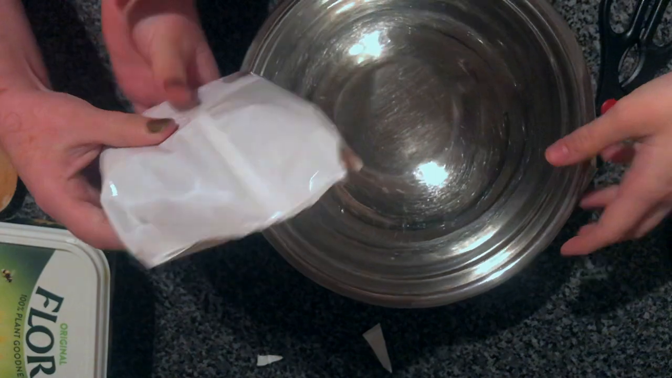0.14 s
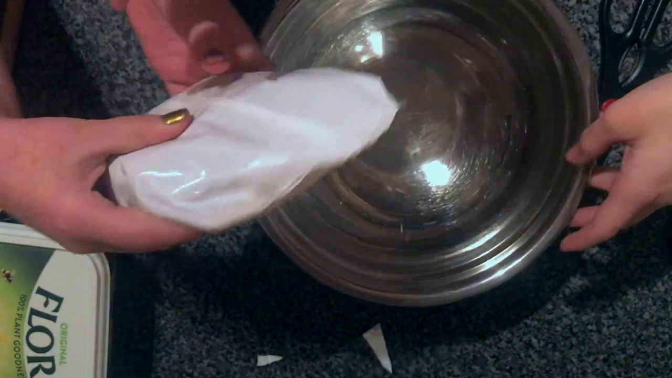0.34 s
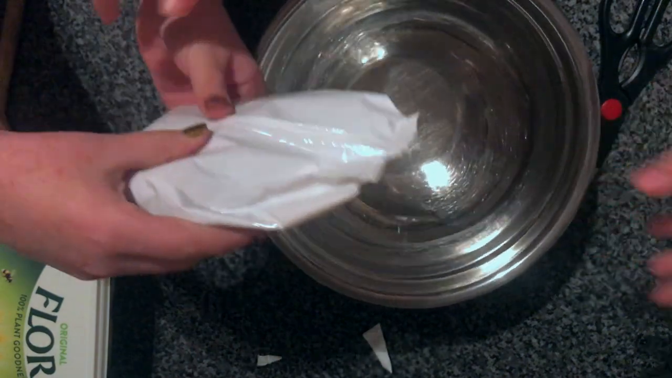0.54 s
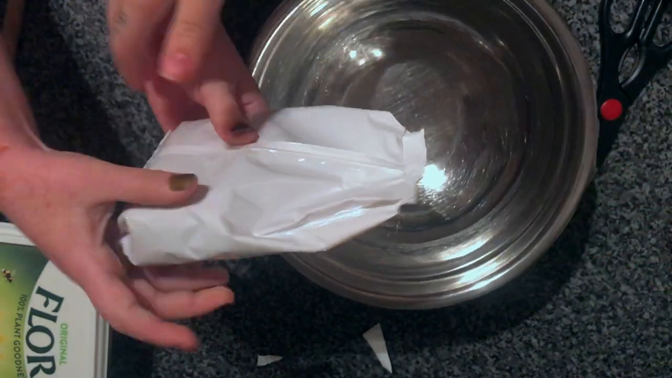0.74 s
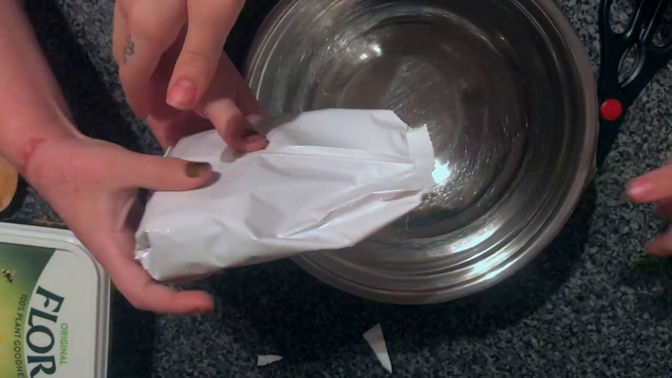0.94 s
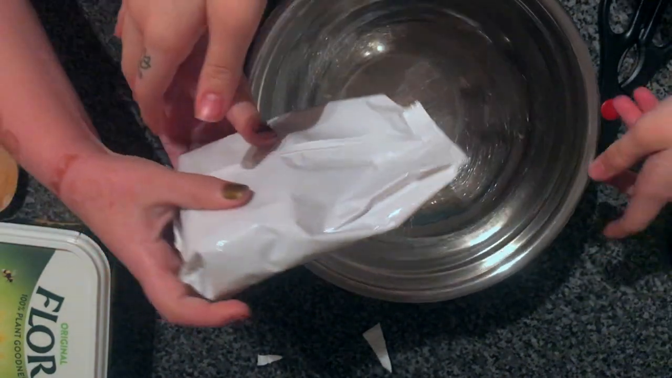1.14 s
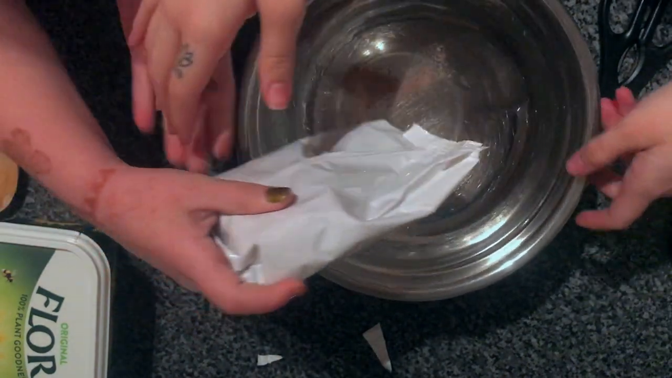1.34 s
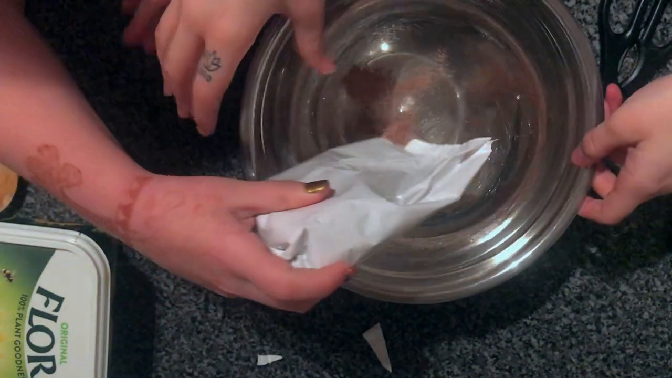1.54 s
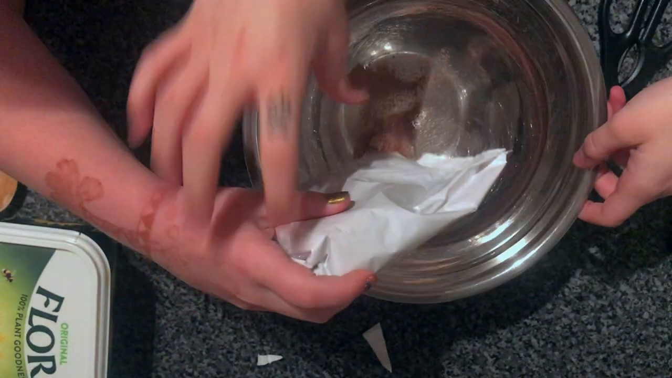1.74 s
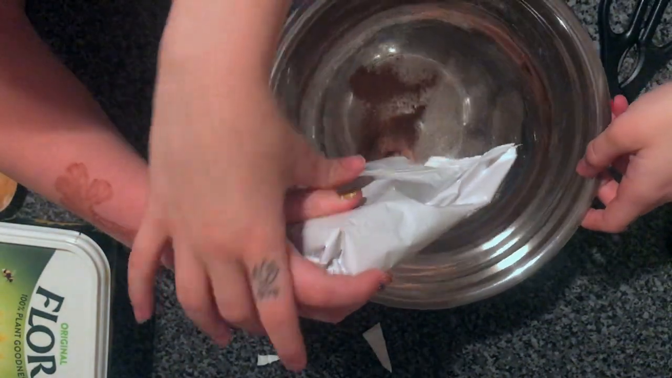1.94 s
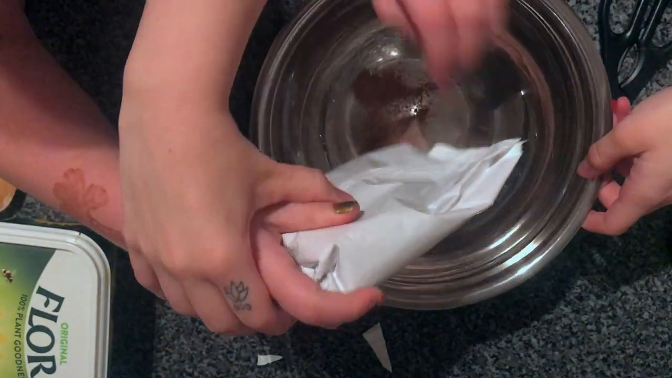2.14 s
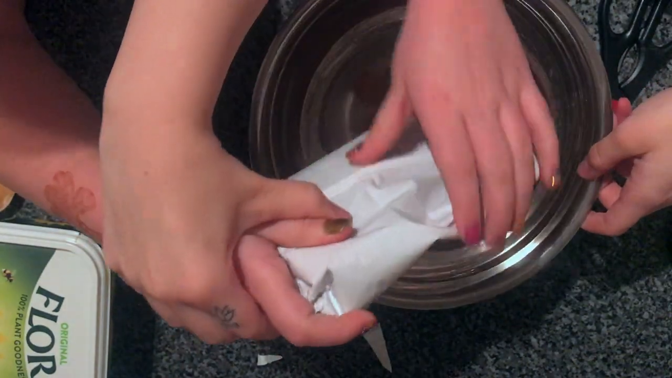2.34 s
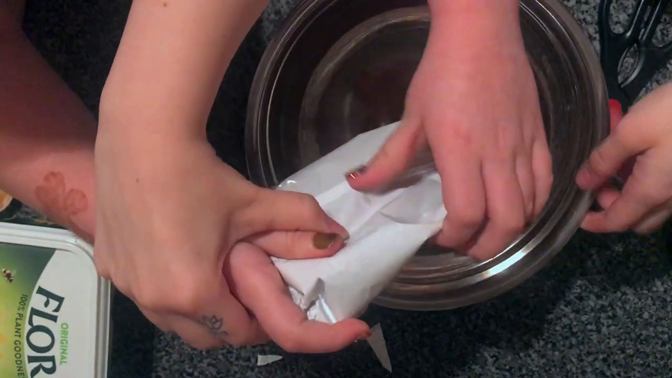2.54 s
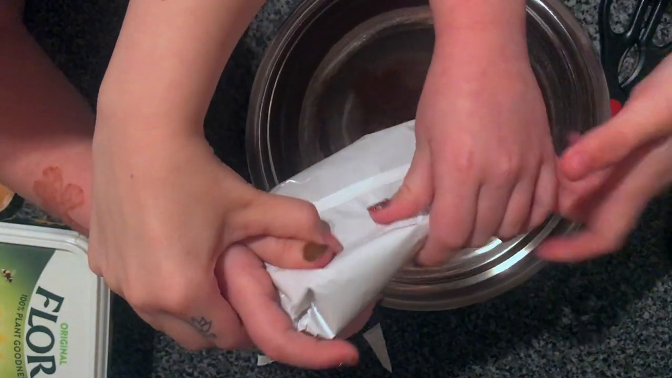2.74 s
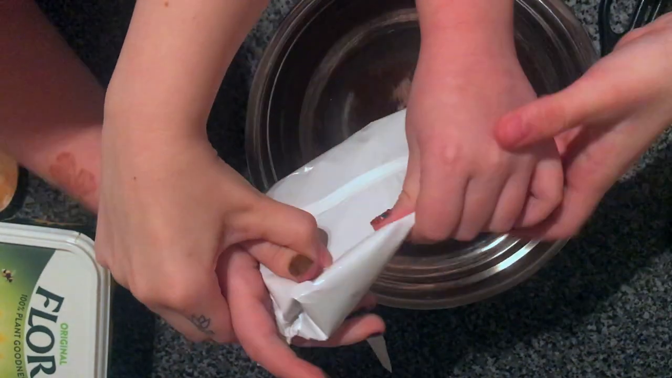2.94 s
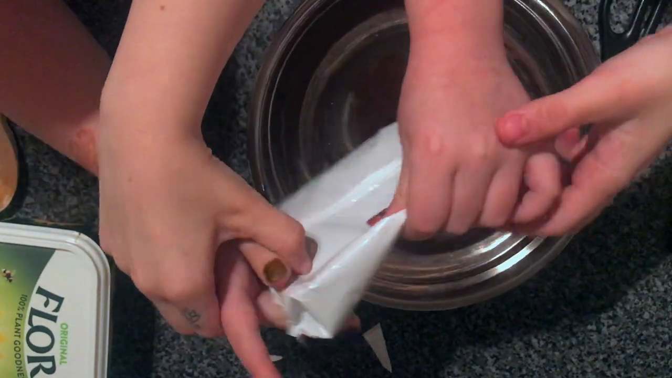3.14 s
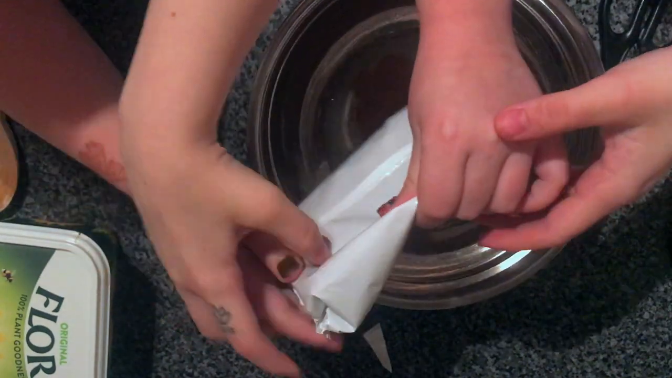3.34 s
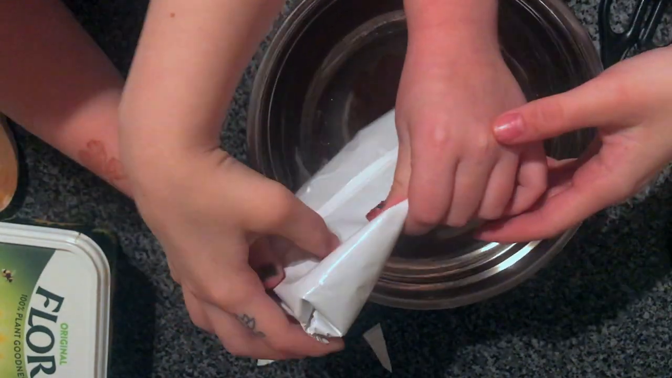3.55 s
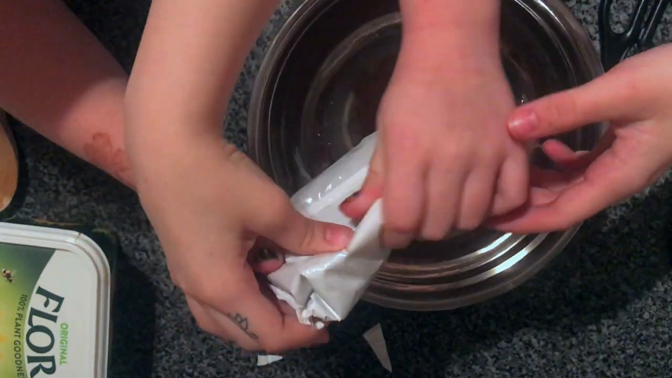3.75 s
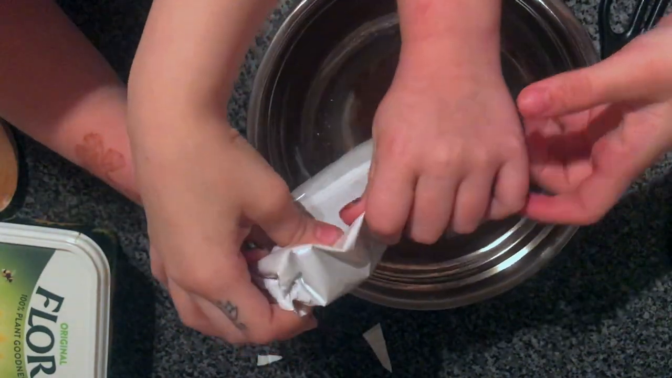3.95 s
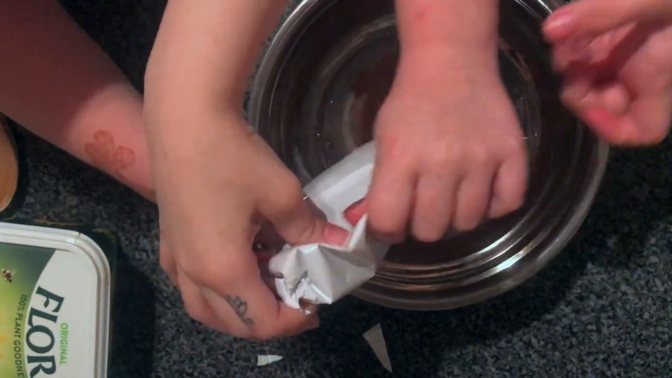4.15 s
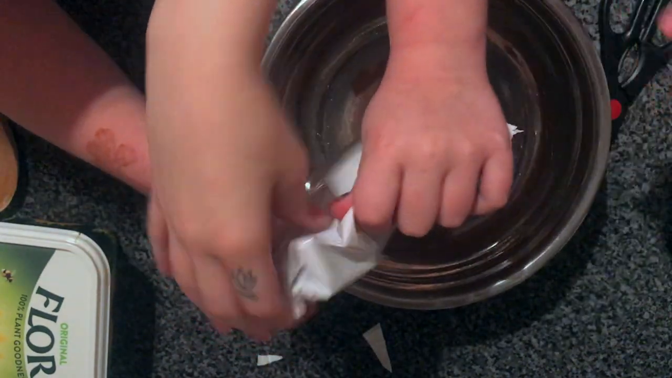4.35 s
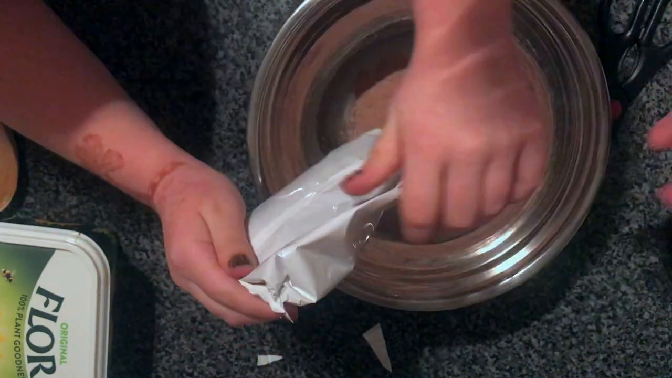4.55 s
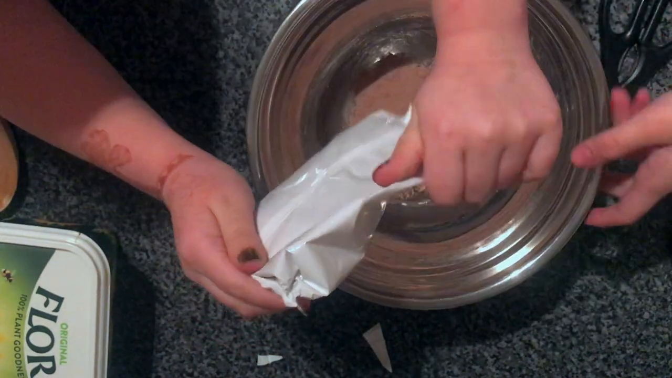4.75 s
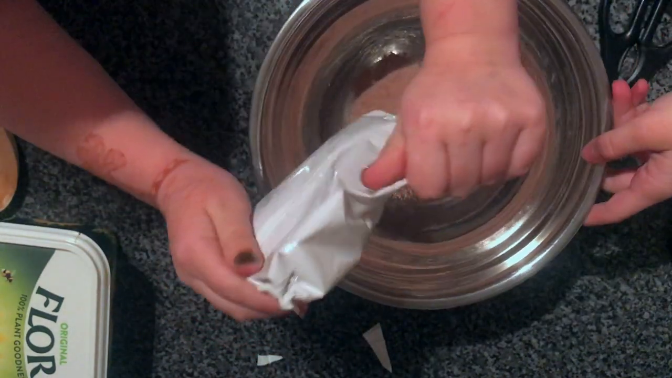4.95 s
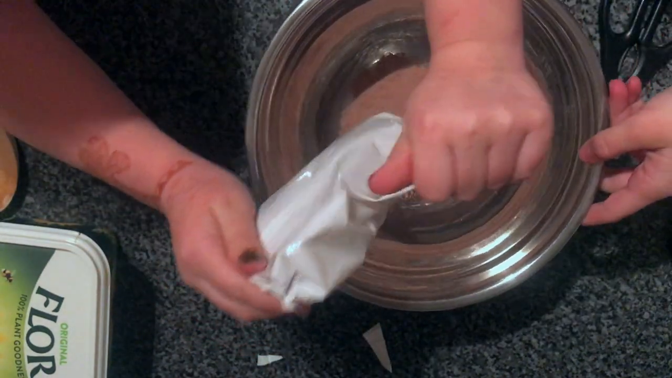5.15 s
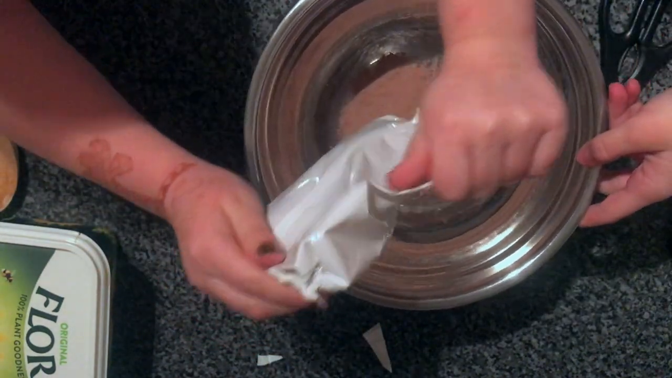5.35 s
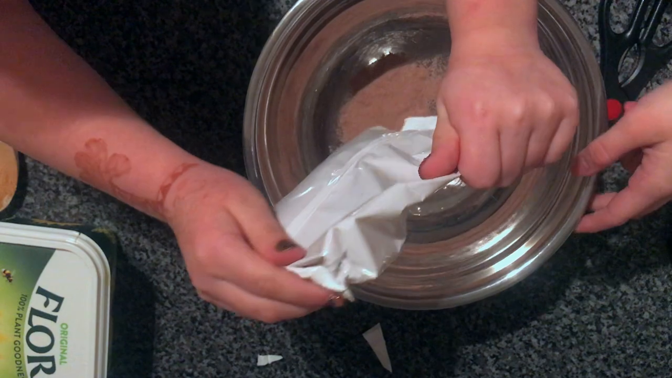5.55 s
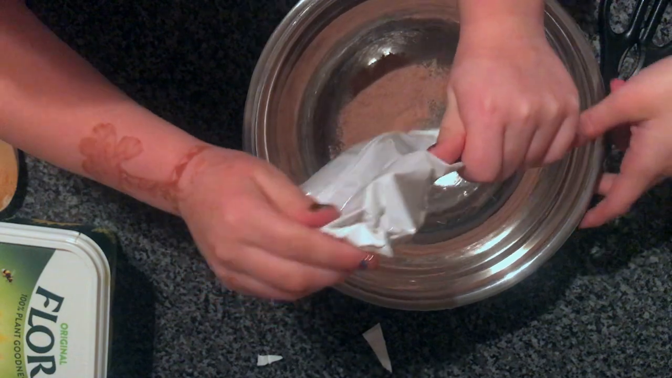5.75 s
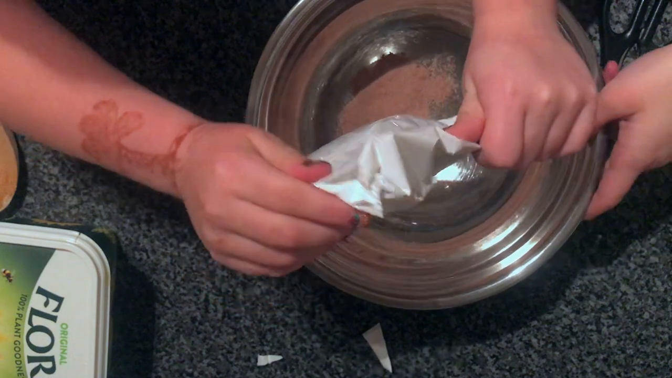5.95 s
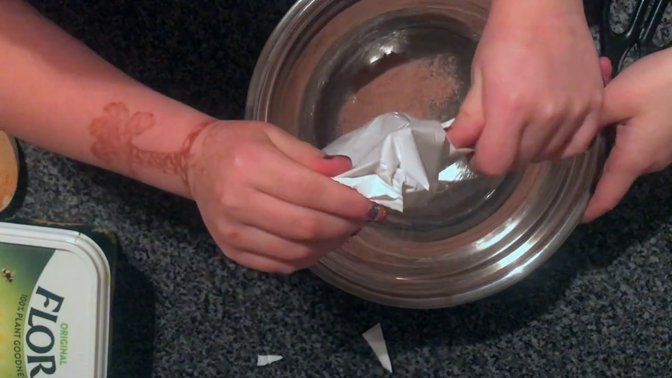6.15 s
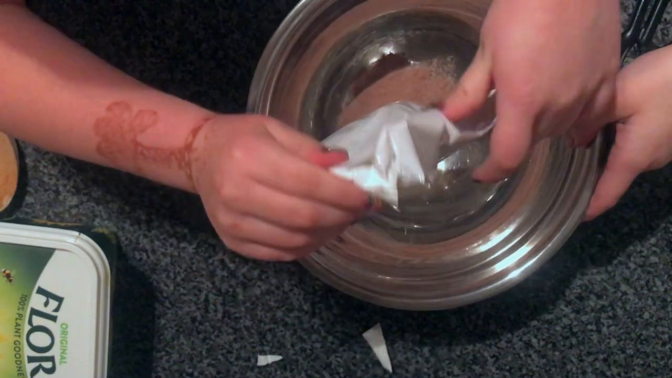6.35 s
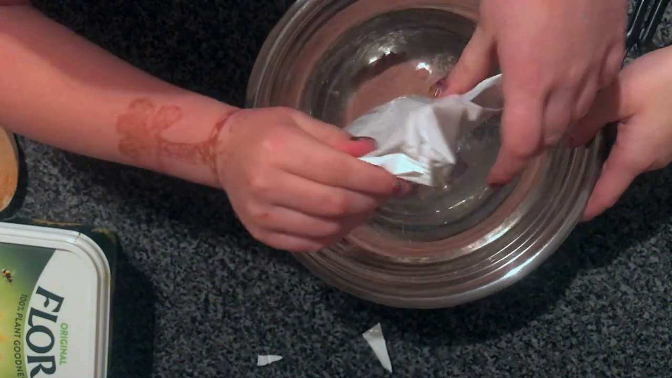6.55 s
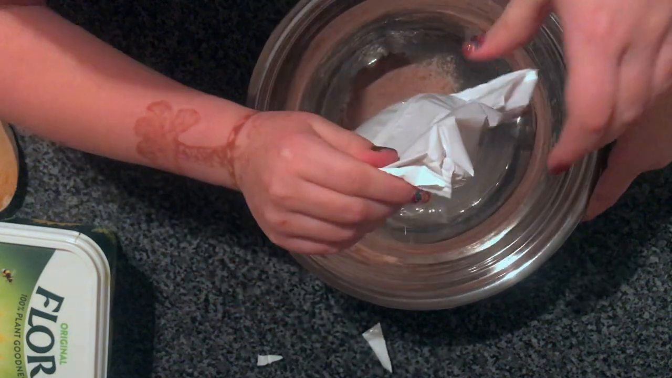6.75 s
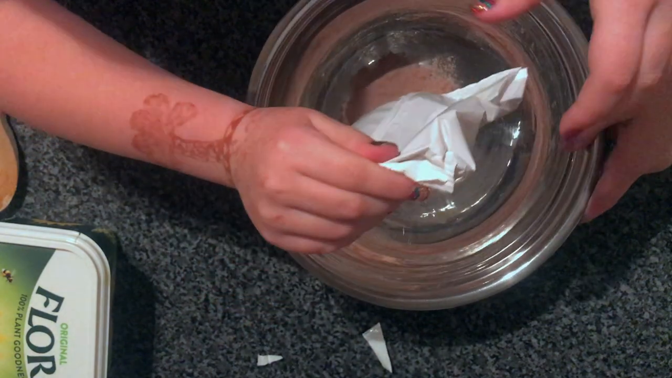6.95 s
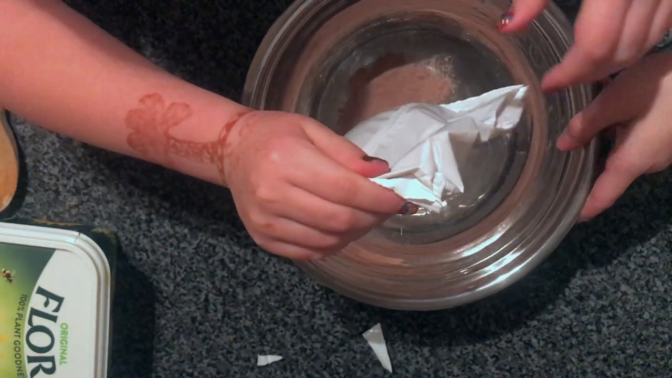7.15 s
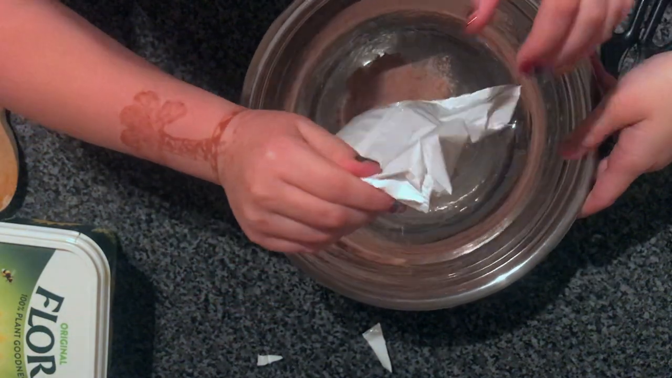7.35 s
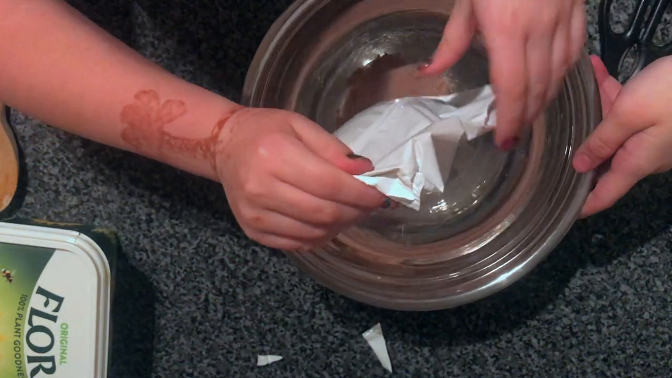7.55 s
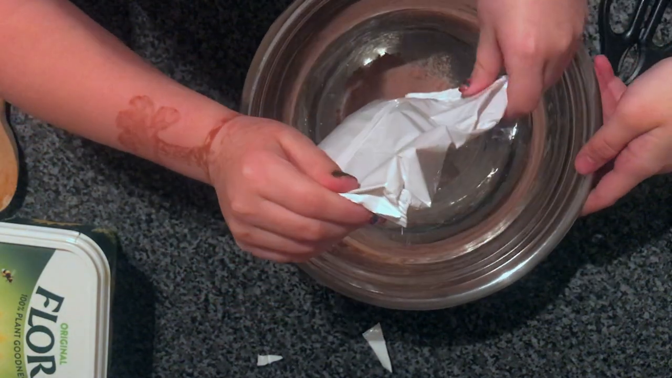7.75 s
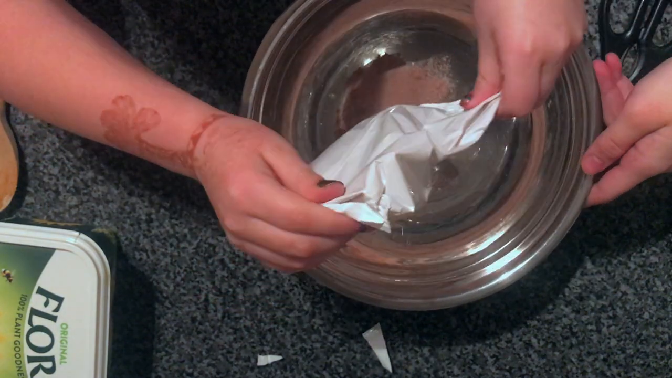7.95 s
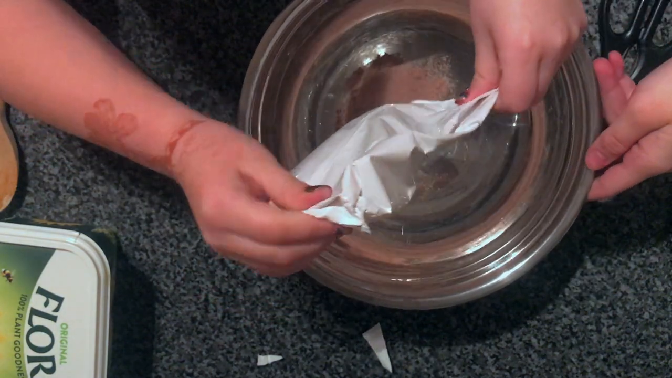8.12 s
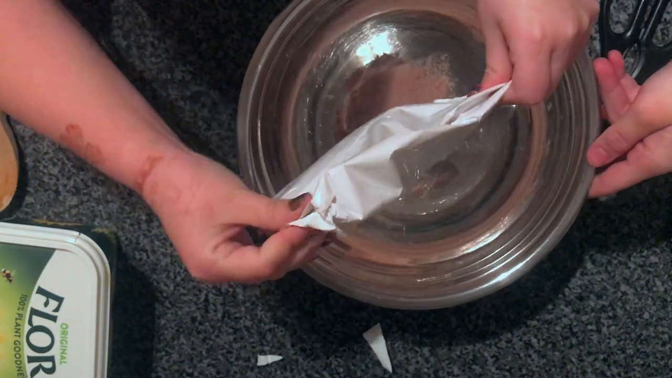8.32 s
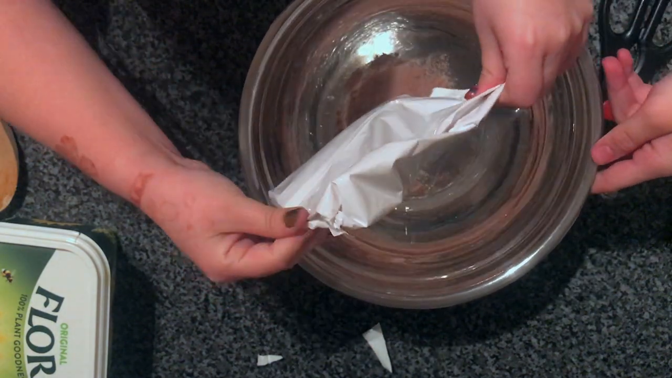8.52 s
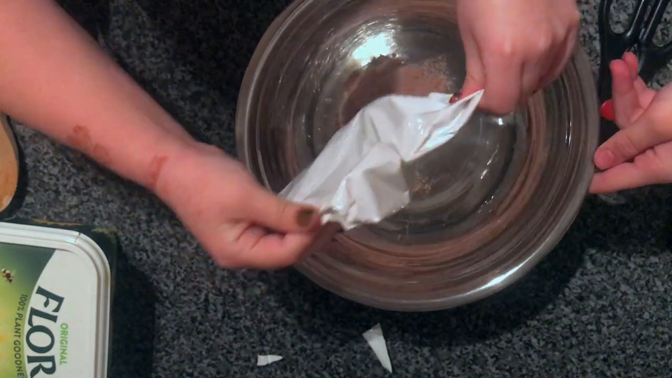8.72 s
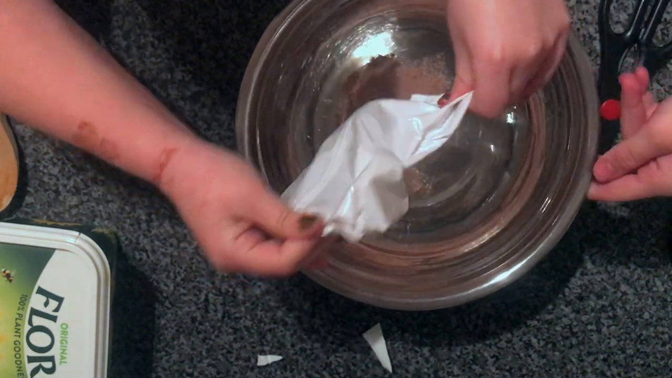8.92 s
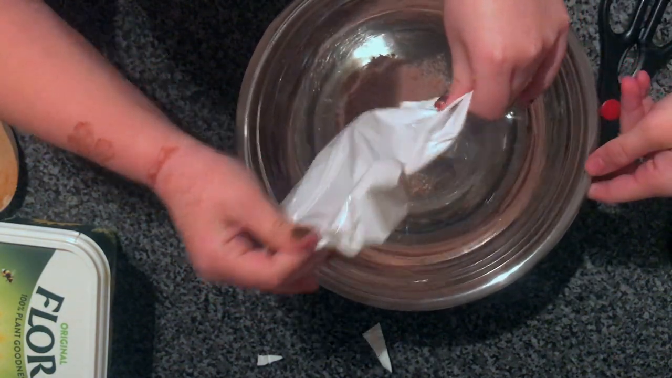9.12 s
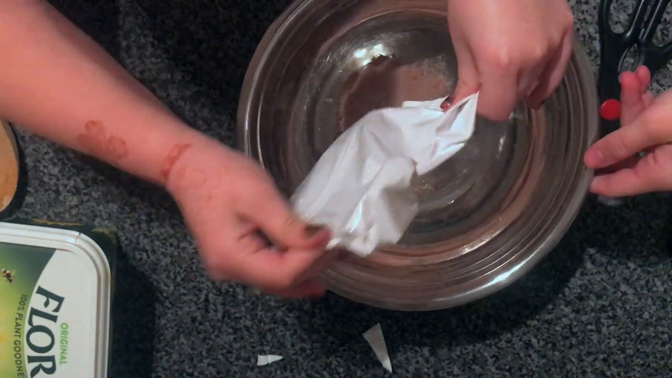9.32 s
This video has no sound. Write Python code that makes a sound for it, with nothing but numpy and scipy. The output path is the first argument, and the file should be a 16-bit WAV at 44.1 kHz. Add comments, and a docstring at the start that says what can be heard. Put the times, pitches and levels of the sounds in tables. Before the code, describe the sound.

A stiff foil-lined packet is shaken, squeezed and crumpled over a metal bowl, crackling in sharp irregular bursts with an early hiss of pouring powder.

```python
"""A stiff foil-lined packet is shaken, squeezed and crumpled over a steel bowl on a kitchen counter.
Creases are filtered clicks with bowl echoes and a panel rattle; finer ones are ticked noise; puffs are sines.
Early on powder pours (shaped noise); thuds on the hollow counter, taps and metal clinks are decaying modes.
A small room adds a diffuse tail; the kitchen hums faintly as shaped noise."""
import sys
import numpy as np
from scipy import signal
from scipy.fft import rfft, irfft, next_fast_len
from scipy.io import wavfile
from scipy.ndimage import map_coordinates

SR = 44100
rng = np.random.default_rng(int(sys.argv[2]) if len(sys.argv) > 2 else 0)


def store_pcm(level_fs):
    """Save levels as 16-bit WAV."""
    pcm = np.round(np.clip(level_fs, -1, 1) * 32767).astype(np.int16)
    wavfile.write(sys.argv[1], SR, np.atleast_2d(pcm).T)


N = 418068

# handling of the packet: t/s, fine crackle level/dB, shifting powder level/dB
HANDLING_LEVELS = [(0.0, -60.5, -68.5), (0.58, -60.5, -58.5), (1.08, -69, -70), (1.4, -58.5, -62),
                   (1.95, -64.5, -62), (2.85, -49, -57), (3.54, -63, -65.5), (3.72, -51, -56),
                   (4.3, -46, -51.5), (4.5, -60.5, -61.5), (4.7, -60, -60.5), (4.94, -45.5, -55.5),
                   (5.35, -47.5, -55), (5.55, -53, -65.5), (6.55, -62, -67), (6.9, -71, -74.5),
                   (7.3, -72, -75.5), (7.7, -67, -65), (8.24, -50.5, -61.5), (8.74, -55.5, -60.5),
                   (8.9, -43, -54.5), (9.48, -50.5, -55.5)]


def amp(db):
    """Gain of a level in dB."""
    return 10 ** (np.asarray(db) / 20)


def unit(x):
    """x at rms 1."""
    return x / np.sqrt(np.mean(x ** 2) + 1e-20)


def along(points, hz):
    """Interpolates (f/Hz, value) points on a log frequency axis."""
    f, v = np.transpose(points)
    return np.interp(np.log(hz + 1), np.log(f + 1), v)


def curves(rows):
    """One value per sample for each column after the time."""
    s, *cols = np.transpose(rows)
    return [np.interp(np.arange(N) / SR, s, c) for c in cols]


def wobble(rate_hz):
    """A smooth random curve with rate_hz knots a second."""
    knots = rng.standard_normal(int(N * rate_hz / SR) + 4)
    return map_coordinates(knots, [np.arange(N) * rate_hz / SR])


def causal(x, gain_db):
    """x through a minimum-phase filter (folded cepstrum); gain_db maps Hz to dB."""
    m = next_fast_len(x.shape[-1] + 2048)
    m += m % 2
    gain = np.maximum(amp(gain_db(np.fft.rfftfreq(m, 1 / SR))), 1e-6)
    cep = irfft(np.log(gain), m)
    cep[..., 1:m // 2] *= 2
    cep[..., m // 2 + 1:] = 0
    return irfft(rfft(x, m) * np.exp(rfft(cep)), m)[..., :x.shape[-1]]


def place(times_s, rows):
    """Sums one short sound per row at its time."""
    start = np.round(np.asarray(times_s) * SR).astype(int)
    at = start[:, None] + np.arange(rows.shape[1])
    return np.bincount(at.ravel(), rows.ravel(), N + rows.shape[1])[:N]


def snaps():
    """A crease flips with a sharp click, the bowl returns it, and the panel rattles for a few milliseconds."""
    # loud creases: t/s, level over 0.6 ms/dB, body under 2 kHz/dB, sparkle over 8 kHz/dB, panel f/Hz
    loud_creases = [(0.0153, -28.5, -12, -12, 3530), (0.0306, -27, -15, 7, 5600.0),
                    (0.0737, -25.5, -2, 2, 5640.0), (0.0837, -27, 1, -1, 4230), (0.23, -37, -15, 4, 3800),
                    (0.2842, -37, -2, -5, 5940), (0.3378, -22.0, -5.0, -5.5, 2040.0),
                    (0.6072, -24.5, -9, -9, 4560), (0.6628, -20.5, -10, -10, 4300),
                    (0.7085, -30, 1, -6, 4050.0), (0.7581, -30.5, -13, -8.5, 4270),
                    (1.0566, -35.5, -10, -5.5, 3700.0), (1.2074, -33.5, 7, -8, 6290),
                    (1.252, -21, -10, -6, 2370), (1.4259, -37, 2, -6, 4570), (1.544, -29, 3, -8, 3060.0),
                    (1.5732, -24.5, -7.0, -2, 4100), (1.6782, -39.5, 2, -11, 1510),
                    (1.8044, -19.5, 4.5, -10, 1840.0), (2.1164, -38, 14, -29, 895.0),
                    (2.184, -39, 4, -31, 1810), (2.1982, -34.5, 3, -37, 2250), (2.2464, -30, -1, -3, 6370),
                    (2.261, -24, -4.5, -13, 1160.0), (2.3001, -23.5, 1, -28, 1020),
                    (2.31, -24.0, 7, -12.0, 1700), (2.3316, -14.0, -5, -4.5, 1250),
                    (2.4345, -16.0, -4.5, 0.5, 3320.0), (2.5466, -18.5, -7, -3, 5850.0),
                    (2.6068, -9.5, -4.5, 0, 4800), (2.6536, -25, -3, -9.0, 1450),
                    (2.6981, -19.5, -2, -6, 1340), (2.7185, -18.5, -2, -9.5, 1380),
                    (2.7502, -15, 4, 2, 2370.0), (2.7637, -10.5, -2.5, -5.5, 1290.0),
                    (2.8, -16, -1, -6, 5130.0), (2.8143, -16, -10.0, -1.0, 3320.0),
                    (2.8194, -13, 0, -7.0, 3350.0), (2.8229, -14.0, -1.5, -14, 2190),
                    (2.828, -19, 0, -18, 890), (2.8344, -17, -5, -3, 5860.0),
                    (2.8466, -18.5, -18, -7, 2450), (2.8964, -23.5, -10, -8, 990),
                    (2.9165, -26.0, 0, -20.0, 1800), (2.9802, -26.5, -8.0, -17, 1700),
                    (3.0373, -12.5, -11.5, -5, 6050), (3.1073, -23, 1.5, -3, 2360),
                    (3.1253, -23, -0.5, -6, 870.0), (3.2488, -19, 3.0, -3, 2350),
                    (3.2689, -16.5, -2.5, -5, 3720), (3.3206, -19, -7, -4, 1620),
                    (3.4292, -29.5, -5, -14.0, 4150.0), (3.5778, -25, -20, 0, 6860.0),
                    (3.5901, -16.5, -12, -12, 2430), (3.629, -24.5, -1, -16, 2110),
                    (3.6494, -23.5, -2, -2, 6590.0), (3.6666, -20, -6.0, -10, 4040),
                    (3.6884, -18, -4.0, -9, 1570), (3.7413, -22.5, -6, -14.5, 2630),
                    (3.8209, -10.5, -1, 3, 1590), (3.8309, -18, 0, -15.5, 2440.0),
                    (3.8733, -12.5, -11, 0.5, 4200), (3.8988, -27.5, -9, -2, 5210),
                    (3.9287, -23.0, -8.0, -2, 3500), (3.9358, -22.5, -18, -8, 5900.0),
                    (4.0254, -10.5, -7.5, 1, 3730), (4.0446, -11, 0.5, -10, 3270),
                    (4.0674, -20.5, -8, -7, 2730), (4.0806, -23, -4, -2.5, 940),
                    (4.1588, -23, 1, -15.0, 2630.0), (4.1729, -12.5, -6.5, -20, 940),
                    (4.1796, -6, -9, -5, 3270), (4.2475, -13.0, -5.5, -0.5, 3580),
                    (4.2759, -27, -8, -7.0, 4180.0), (4.2963, -14, -5, -2, 6700.0),
                    (4.3246, -28, -3, -23, 3400.0), (4.3362, -17.0, 2, 0.0, 7000.0),
                    (4.3673, -21.5, -1.0, -6, 3600), (4.3869, -17.5, -13, -2, 3420.0),
                    (4.4265, -21.5, 5, -4, 3120.0), (4.4374, -20.0, -1, -19, 2460.0),
                    (4.4674, -29, -6, 0, 3630.0), (4.639, -38, -11, -18, 1600),
                    (4.6675, -29, -7, -20.0, 1460.0), (4.7558, -22, -3, -4.0, 2870.0),
                    (4.7739, -8.5, -2, 4, 4200), (4.7839, -9, -8, -2.5, 5640.0),
                    (4.8384, -16.5, -8, -10, 4570.0), (4.8532, -17.5, -4, -9, 3270.0),
                    (4.881, -14.5, -15.5, -4, 3880.0), (4.9094, -18, -6.0, -25, 3750.0),
                    (4.9186, -15, -2, 5, 3490.0), (4.9527, -12.5, -2.5, 1.5, 3880),
                    (5.0475, -18.5, -7, -42.5, 1600.0), (5.0593, -26, 1, -24, 2230.0),
                    (5.0674, -16.5, -6, -3, 2130), (5.0958, -26.5, -6.5, 11, 6550.0),
                    (5.1309, -14, -17, -8.5, 4300), (5.1592, -15.5, -2, -0.5, 3130),
                    (5.2633, -21.5, 0.5, -30, 3070), (5.3036, -21, 2, -23, 4000),
                    (5.3499, -33, 16, -15, 1680.0), (5.382, -16.5, -6, -10, 3660.0),
                    (5.4011, -11.5, -3, -8, 3900), (5.4076, -5.0, -7.5, -2, 2190),
                    (5.4815, -26.5, 1, -8, 1600), (5.499, -34, 6, -13.5, 3970), (5.545, -22, -19, -2, 6400),
                    (5.675, -24.5, -4, 0, 1590), (5.7453, -28, -9.5, -14.5, 3300.0),
                    (5.7537, -17, 5.5, -2, 3140), (5.7794, -8, -12.5, -3.5, 3750),
                    (5.8365, -28.5, 2, -8.5, 4090.0), (5.9901, -14.5, -9, 8, 2470),
                    (6.0328, -21.5, -3, -11.5, 1340), (6.0824, -31, -12, -2.0, 1530),
                    (6.1404, -22.0, -5, -7, 3720), (6.1792, -33, 2.5, -9, 2150.0),
                    (6.2833, -26.5, -2.5, -26.5, 2150), (6.3772, -35, 2.5, -10.5, 1720.0),
                    (6.4836, -28, -0.5, -16.5, 2690), (6.5186, -24, 4, -6.5, 2580.0),
                    (6.5415, -25.5, 2.5, -7, 1480), (6.6902, -16.5, -30.5, -1.5, 5370),
                    (6.9528, -42, 4.0, -5.5, 1680.0), (7.338, -53, -10, -5, 3340),
                    (7.5271, -48.5, -12, -13, 3830), (7.7904, -27.5, -6, -12.5, 3640),
                    (7.8281, -12, -3.5, -3.5, 1970), (7.8806, -30.5, 2, 4, 1070),
                    (7.9436, -27.0, -11, -12, 1740.0), (7.9904, -22.5, -23.0, -2, 5330),
                    (8.0151, -27.0, 2, -4, 3360.0), (8.0806, -16.5, -7.5, 4.5, 2630.0),
                    (8.1247, -18.5, -14, -8.5, 2080), (8.1415, -32, 4, -5, 2200),
                    (8.1802, -21, -8, -17, 1810.0), (8.2074, -15, -6, -2.5, 2260),
                    (8.2516, -25, -6.0, -7.5, 2630.0), (8.2711, -20.0, -4, -9.0, 5170.0),
                    (8.2855, -15.5, -7, -4.5, 5800.0), (8.367, -12.5, -10.0, -2.5, 2290),
                    (8.404, -20, -7, 2.0, 3490.0), (8.4159, -16.5, 0.5, -11.5, 2330),
                    (8.4652, -20, 9, -8, 1780.0), (8.486, -25.5, 7, -6.5, 2630),
                    (8.5226, -14.5, -9.0, -9, 2500), (8.5436, -21, -7, 0, 1720.0),
                    (8.6749, -12.5, -14, -8, 2540), (8.6883, -17, -17, -12, 3920.0),
                    (8.6986, -13.5, -11, 6, 2400.0), (8.7199, -20, 3.0, -14.0, 1960),
                    (8.7374, -16.5, 1, -7, 2780.0), (8.776, -15.5, -10, -16, 2820),
                    (8.7867, -23.5, -12, 0, 3170.0), (8.8173, -19, -9, -7, 2500.0),
                    (8.84, -12.5, -3.5, -4.5, 4600), (8.9141, -14, -32.0, -1, 6700.0),
                    (8.9517, -14, -6, -1, 2410.0), (8.9754, -8.5, -1, 6, 2360),
                    (8.9887, -18, -13, 2, 7100.0), (9.0264, -24, -17, -4, 2020.0),
                    (9.0388, -9, -8, 0.5, 2680), (9.0923, -20, -26.0, -6.0, 5530),
                    (9.1257, -14.5, -5.0, 1, 1740), (9.1609, -26, -4.0, -20, 1800.0),
                    (9.1705, -8, -15, 4.5, 2540), (9.1854, -12.5, 0, 4, 2700),
                    (9.2262, -25, -13, 0, 5000.0), (9.2509, -22.5, -1.5, -8, 2400),
                    (9.3203, -24.5, -19, -2.0, 4260.0), (9.3304, -13.5, -26.0, 5.5, 2440),
                    (9.3869, -21, -3, -10.0, 1770), (9.3966, -17.5, -3.5, -15, 2380),
                    (9.4249, -22, -9, -6.0, 1800), (9.452, -21.5, 1, -3.5, 2500.0)]
    # bowl reflections: delay/s, level/dB
    bowl_echoes = [(.0017, -15), (.0035, -12)]
    bag_hz, bag_db = 314, 13.5  # the whole packet flexes with each crease

    creases = np.vstack([loud_creases, small_creases()])
    s, db, body_db, sparkle_db, panel_hz = np.transpose(creases)[:, :, None]
    t = np.arange(SR // 20) / SR
    noise = rng.standard_normal((len(s), 2 * len(t)))
    click = (t == 0) + 0.7 * noise[:, :len(t)] * amp(-60 * t / 0.0018)
    click = click + sum(amp(g) * np.roll(click, round(d * SR), axis=1) for d, g in bowl_echoes)
    dull = signal.lfilter([.6], [1, -.4], noise[:, len(t):])  # the rattle is duller than the click
    rattle = amp(-7.5 - 60 * t / 0.027) * (1 - np.exp(-t / 0.00026)) * dull

    def colour_db(hz):
        low = np.clip(np.log2(2200 / (hz + 1)) / 1.3, 0, 1)
        high = np.clip(np.log2((hz + 1) / 6000) / 0.53, 0, 1)
        thin_db = -16 * np.clip(np.log2(850 / (hz + 1)), 0, 6)  # a small panel radiates little bass
        flex_db = bag_db / (1 + (np.log2((hz + 1) / bag_hz) / .5) ** 2)
        panel_peak_db = 12 * np.clip(2500 / panel_hz, .3, 1)  # weaker when high
        panel_db = panel_peak_db / (1 + (np.log2((hz + 1) / panel_hz) / .11) ** 2)
        cavity_db = 6 / (1 + ((hz - 1040) / 60) ** 2)  # the air in the bowl
        return body_db * low + sparkle_db * high + thin_db + flex_db + panel_db + cavity_db

    rows = causal(click + rattle, colour_db)
    size = np.linalg.norm(rows, axis=1, keepdims=True) / np.sqrt(SR * .0006)  # all energy as rms over 0.6 ms
    return place(s[:, 0], amp(db) * rows / size)


def small_creases():
    """Rows for the many small creases: denser and stronger where the packet is handled harder."""
    count = 95
    over_crackle_db, spread_db, usual_sparkle_db, usual_panel_hz = 18.5, 3.5, -12.5, 2500
    usual_body_db, body_db_per_octave, body_scatter_db = -6, -4.5, 7  # more body on lower panels

    crackle_db, _ = curves(HANDLING_LEVELS)
    share = np.cumsum(amp(crackle_db / 2))
    when, size = rng.random((count, 2)).T
    body, sparkle_scatter_db, octaves = rng.standard_normal((count, 3)).T * [[1], [7], [.6]]
    at = np.interp(when, share / share[-1], np.arange(N)).astype(int)
    db = crackle_db[at] + over_crackle_db - spread_db * np.log(1 - size)
    body_db = usual_body_db + body_db_per_octave * octaves + body_scatter_db * body
    panel_hz = np.clip(usual_panel_hz * 2 ** octaves, 900, 7000)
    return np.transpose([at / SR, db, body_db, usual_sparkle_db + sparkle_scatter_db, panel_hz])


def handling():
    """Tiny creases tick in clumps over a soft rustle, and the powder shifts inside."""
    # spectrum of the foil crackle: f/Hz, gain/dB
    foil_gain = [(290, -24), (500, -7), (721, -39.5), (911, 7.5), (1950, 6), (2430, 4), (7820, -2.5),
                 (9190, -9), (10600, -4), (15100, -12), (16500, -4)]
    powder_gain = [(100, -28.5), (200, -1.5), (320, -0.5), (500, -6.5), (1000, -16), (3000, -45.5)]

    crackle_db, powder_db = curves(HANDLING_LEVELS)
    sizes_db = np.minimum(4 * rng.exponential(size=N), 16)
    chance = 600 / SR * amp(5 * wobble(25))  # about 600 ticks/s, clumped
    ticks = (rng.random(N) < chance) * amp(sizes_db)
    life = amp(-60 * np.arange(SR // 50) / SR / 0.029)  # each tick rattles briefly
    ticking = unit(signal.fftconvolve(ticks, life)[:N] * rng.standard_normal(N))
    grains = ticking + .5 * rng.standard_normal(N)
    crackle = unit(causal(grains, lambda hz: along(foil_gain, hz)))
    powder = causal(rng.standard_normal(N), lambda hz: along(powder_gain, hz))
    lumps = amp(3.5 * wobble(30))
    return amp(crackle_db) * crackle + amp(powder_db) * unit(powder * lumps)


def puffs():
    """Squeezing the packet pushes air out in low, fast-dying sine puffs."""
    # puffs: t/s, level before the final doubling/dB, f/Hz
    air_puffs = [(2.263, -46, 330), (2.301, -42, 300), (2.326, -37, 339), (2.433, -45, 226),
                 (2.606, -39, 236), (2.696, -41, 358), (2.763, -32.5, 313), (2.822, -36, 151),
                 (3.1, -40, 200), (3.249, -52, 272), (3.628, -45.5, 218), (3.688, -40, 331),
                 (3.832, -45, 339), (3.935, -49, 326), (4.028, -36, 368), (4.14, -48, 342),
                 (4.247, -41, 285), (4.334, -39, 342), (4.766, -36, 253), (4.951, -47, 291),
                 (5.157, -40.5, 283), (5.389, -45, 237), (8.081, -47, 237), (8.839, -34.5, 221),
                 (8.953, -36, 229), (9.186, -38, 361), (9.378, -39.5, 233)]
    t60_s, attack_s = 0.042, 0.0012

    s, db, hz = np.transpose(air_puffs)[:, :, None]
    t = np.arange(SR // 10) / SR
    envelope = amp(db - 60 * t / t60_s) * (1 - np.exp(-t / attack_s))
    return place(s[:, 0], envelope * np.sin(2 * np.pi * hz * t) * 2)


def pouring():
    """Fine powder slides out with an airy hiss while people shift their weight on the floor."""
    # pouring: t/s, powder hiss level/dB, floor rumble level/dB
    pour_levels = [(0.0, -56.5, -68), (0.59, -56, -58), (0.95, -64.5, -71), (1.12, -61.5, -72),
                   (1.45, -47.5, -58), (1.68, -56.5, -72), (1.95, -80, -57), (2.17, -86, -56),
                   (2.3, -85.5, -71)]
    hiss_gain = [(600, -44), (2000, -5.5), (6000, -2.0), (13000, -5.5)]
    rumble_gain = [(25, -48), (50, 6), (75, -5.5), (110, -1.5), (300, -75)]

    hiss_db, rumble_db = curves(pour_levels)
    hiss = unit(causal(rng.standard_normal(N), lambda hz: along(hiss_gain, hz)))
    rumble = unit(causal(rng.standard_normal(N), lambda hz: along(rumble_gain, hz)))
    end_s = pour_levels[-1][0] + 0.27
    active = np.clip((end_s - np.arange(N) / SR) / .2, 0, 1)  # 0.2 s fade-out
    return active * (amp(hiss_db + 2.3 * wobble(40)) * hiss + amp(rumble_db + 6.0 * wobble(12)) * rumble)


def struck(s, db, modes, tilt_db, attack_s):
    """Each blow rings the same modes at new strengths; tilt_db per octave favours the upper ones."""
    t = np.arange(SR // 2) / SR
    hz, level_db, t60_s = np.transpose(modes)[:, :, None]
    scatter_db = 1.5 * rng.standard_normal((len(s), len(hz)))
    octaves = np.log2(hz / hz[np.argmax(level_db)])  # from the strongest mode
    strength_db = scatter_db + np.outer(tilt_db, octaves)
    partials = amp(level_db - 60 * t / t60_s) * np.sin(2 * np.pi * hz * t)
    ring = amp(strength_db) @ partials
    return place(s, amp(db)[:, None] * ring * (1 - np.exp(-t / attack_s)))


def thuds():
    """Soft blows ring the counter's low modes; finger taps ring something hollow."""
    # blows on the counter: t/s, level/dB, hardness/(dB/octave)
    counter_blows = [(0.335, -48, -2), (0.501, -41, 5.5), (0.516, -34.5, -7.5), (0.76, -39.5, -1.5),
                     (0.784, -40, -6), (0.853, -48, -14), (1.209, -26.5, -1.5), (1.469, -44.5, -7),
                     (1.916, -38, -5), (1.925, -41, -4), (1.969, -45.5, 2.5)]
    # counter modes: f/Hz, level/dB, t60/s
    counter_modes = [(95.6, -8, 0.14), (148, -9, 0.315), (186, 9, 0.12), (238, -1.5, 0.12), (307, 1, 0.14),
                     (563, -2.5, 0.059)]
    # finger taps on something hollow: t/s, level/dB, hardness/(dB/octave)
    finger_taps = [(1.631, -41.5, -6), (1.804, -37, 5.5), (6.542, -40.5, -8.5)]
    # modes of the hollow thing: f/Hz, level/dB, t60/s
    hollow_modes = [(546, -6.5, 0.25), (616, 2.5, .1), (687, 1, 0.088), (1351, -15, 0.14),
                    (1793, -13, 0.14), (2590, -17, 0.15), (3000, -17, 0.083), (3200, -11, 0.11),
                    (4400, -26.5, 0.13)]

    s, db, tilt_db = np.transpose(counter_blows)
    tap_s, tap_db, tap_tilt_db = np.transpose(finger_taps)
    counter = struck(s, db, counter_modes, tilt_db, attack_s=0.0034)
    hollow = struck(tap_s, tap_db, hollow_modes, tap_tilt_db, attack_s=0.0002)
    return counter + hollow


def clinks():
    """Small metal things slide together: their modes ring over a short scrape."""
    # clinks: t/s, level/dB
    metal_hits = [(1.9617, -22.5), (1.9744, -21), (1.9897, -43)]
    # metal modes: f/Hz, level/dB, t60/s
    metal_modes = [(644, -32, 0.33), (1014, -36, .25), (2063, -27, 0.25), (2126, -24, .25),
                   (2360, -38, .35), (2760, -36, .3), (3413, -28, 0.34), (4156, -23, .2), (4447, -26, .2),
                   (5216, -28, .2), (5932, -32, .15), (7000, -16, 0.11), (8300, -25, 0.13),
                   (9507, -30, 0.22)]
    scrape_gain = [(800, -8.5), (3000, 1.5), (9000, -7), (13000, -11.5)]

    s, db = np.transpose(metal_hits)
    t = np.arange(SR // 4) / SR
    burst = amp(-60 * t / .1) * rng.standard_normal((len(s), len(t)))
    scrape = causal(burst, lambda hz: along(scrape_gain, hz))
    ring = struck(s, db, metal_modes, 0 * s, attack_s=0.0004)
    return ring + place(s, amp(db - 10.0)[:, None] * scrape)


def room(x):
    """Diffuse tail: energy at each frequency lingers and dies at its own speed, with ever new fine structure."""
    # room decay: f/Hz, t60/s
    decay_t60 = [(150, 0.22), (800, 0.25), (2000, 0.25), (6000, 0.16), (15000, 0.098)]
    size, hop = 128, 32

    hz, _, z = signal.stft(x, SR, nperseg=size, noverlap=size - hop)
    keep = amp(-120 * hop / SR / along(decay_t60, hz))  # energy, not amplitude: 120 here is 60 dB per t60
    energy = np.array([signal.lfilter([1 - k], [1, -k], np.abs(row) ** 2) for k, row in zip(keep, z)])
    noise = signal.stft(rng.standard_normal(N), SR, nperseg=size, noverlap=size - hop)[2]
    tail = signal.istft(np.sqrt(energy * size) * noise, SR, nperseg=size, noverlap=size - hop)[1]
    return np.pad(tail, (round(0.0033 * SR), 0))[:N]  # 3.3 ms pre-delay


def kitchen():
    """The faint hum and hiss of the kitchen: shaped noise with a slight waver in level."""
    # kitchen spectrum: f/Hz, gain/dB
    kitchen_gain = [(25, -32), (38, -16), (50, 3.5), (60, -10), (72, -3.5), (85, -3.5), (100, -5),
                    (130, -10.5), (145, -3), (170, -11.5), (330, -17), (700, -14), (1000, -25),
                    (2000, -24.5), (16000, -31)]
    level_db = -62.5

    waver_db = 1.5 * wobble(4)
    hum = unit(causal(rng.standard_normal(N), lambda hz: along(kitchen_gain, hz)))
    return amp(level_db + waver_db) * hum


def scene():
    """Everything near the counter, its room tail and the background."""
    knocks = thuds()
    upper = causal(knocks, lambda hz: -40 * (hz < 450))  # only their part above 450 Hz feeds the room tail
    near = snaps() + handling() + clinks()
    tail = amp(-8.5) * room(near + upper)
    return (near + tail + knocks + puffs() + pouring() + kitchen())[None]


def record(dry):
    """The microphone drops the deepest bass, its housing notches the treble, and a sharp band limit ends it."""
    # microphone response: f/Hz, gain/dB
    mic_gain = [(20, -29.5), (45, -1.5), (4000, -5), (4900, -6.5), (6000, -4), (7700, -4), (9200, -1.5),
                (10400, -5.5), (11800, -2.5)]
    top_hz = 15900

    m = next_fast_len(N + SR // 2)
    heard = causal(dry, lambda hz: along(mic_gain, hz))
    in_band = np.fft.rfftfreq(m, 1 / SR) < top_hz
    return irfft(rfft(heard, m) * in_band, m)[:, :N]


dry = scene()
out = record(dry)
store_pcm(out)
```